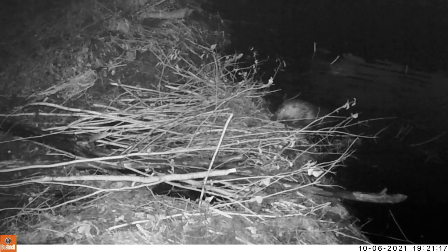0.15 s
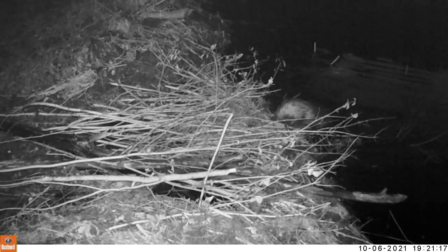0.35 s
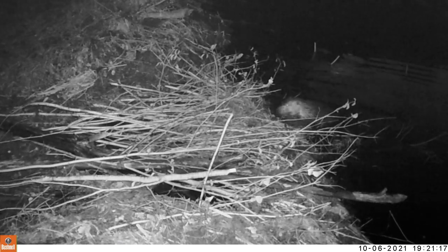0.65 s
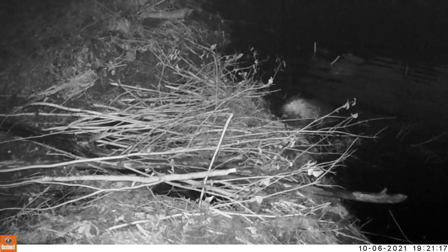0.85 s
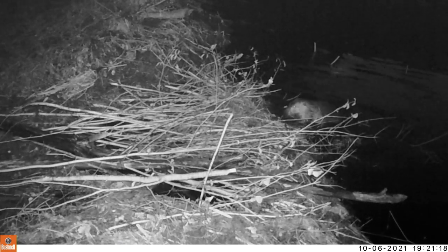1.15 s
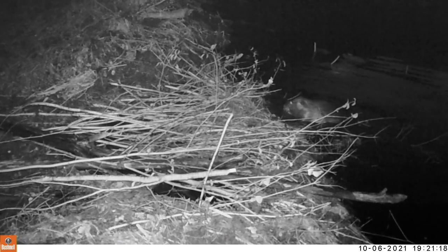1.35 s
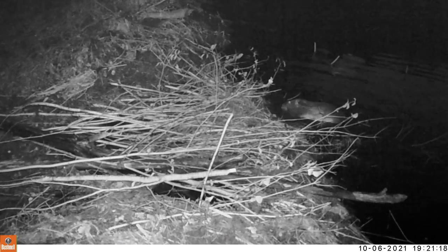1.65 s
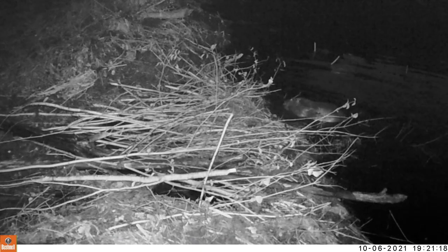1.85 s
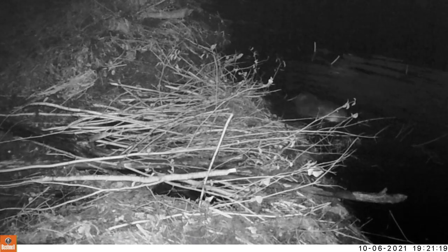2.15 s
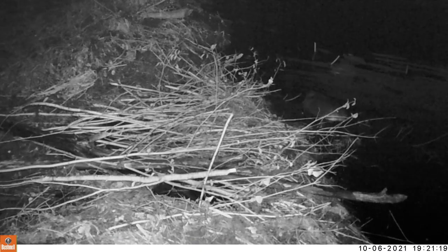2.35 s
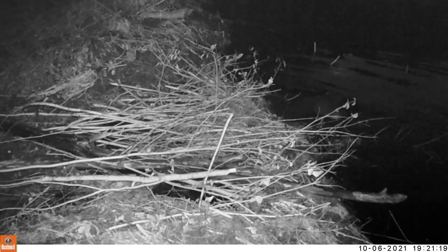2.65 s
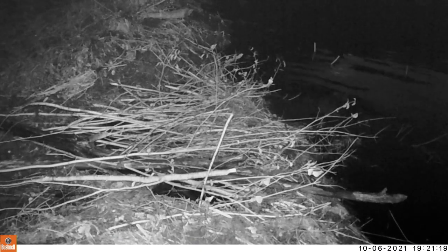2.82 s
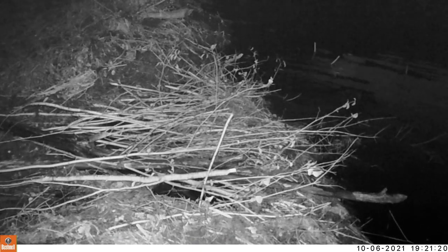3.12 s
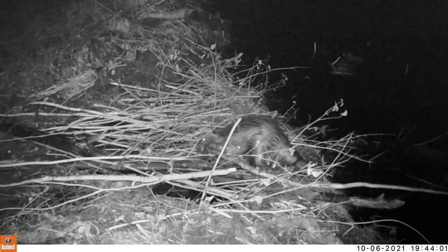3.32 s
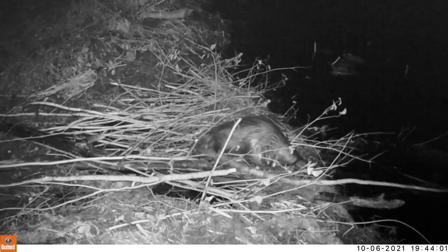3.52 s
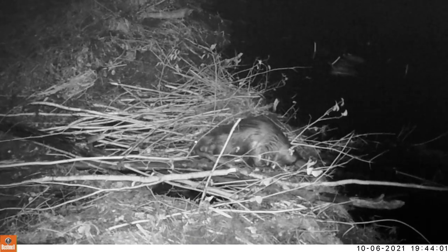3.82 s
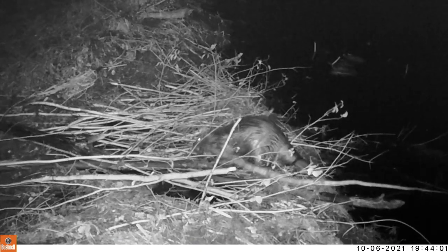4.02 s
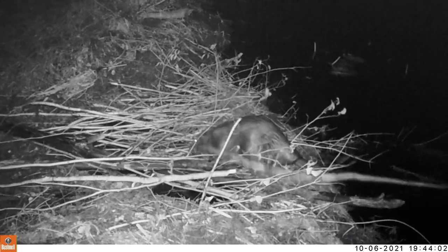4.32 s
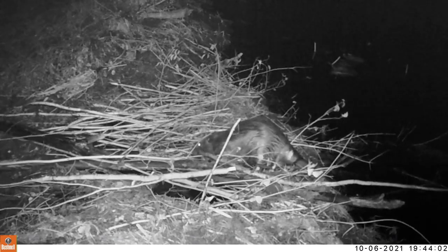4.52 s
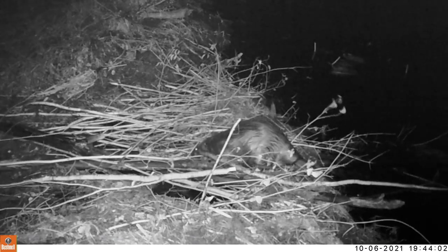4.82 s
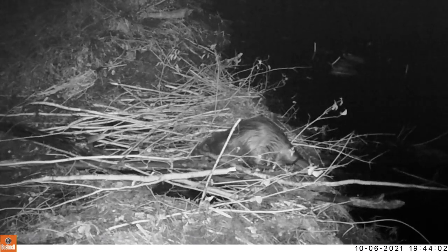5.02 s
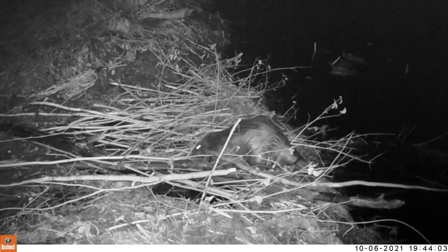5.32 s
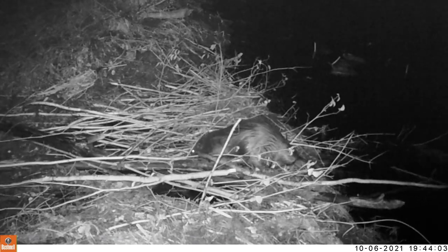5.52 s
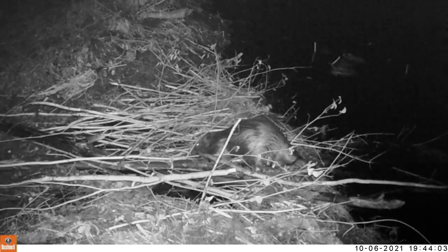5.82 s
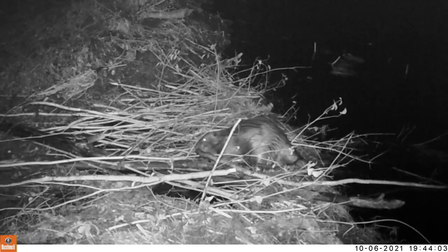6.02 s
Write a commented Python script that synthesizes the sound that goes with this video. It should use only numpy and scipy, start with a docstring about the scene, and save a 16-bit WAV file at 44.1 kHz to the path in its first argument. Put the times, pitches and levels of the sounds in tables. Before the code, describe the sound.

Water rushes low and steady over a beaver dam at night, with small bubbles popping, drops ticking on wet sticks and a faint hum underneath. From the start a cricket trills close by, high-pitched, in quick runs broken by tiny stumbles. A second, brighter cricket joins at about 0.5 seconds, grows louder and stops at 3.3 seconds. At that moment the whole sound drops abruptly to very quiet for half a second. At about 3.8 seconds the water and the close cricket return, and a deeper, wavering hum now stands out. The beaver cracks a twig at 4.3 seconds, followed by a quick cluster of snaps around 4.5 seconds. From about 5.2 seconds the cricket slows, halting near 5.8 seconds. One more sharp twig snap comes at 5.9 seconds, while the water and hum carry on to the end, just after 6 seconds.

```python
"""Night at a beaver dam. Water rushes low over a faint hum, bubbling and trickling through the sticks.
From the start a cricket trills close by, scraping its wings together and stumbling now and then.
A brighter one joins it from 0.5 s to 3.3 s. Then the level drops abruptly for half a second,
and after that a deeper hum stands out. From 4.3 s the beaver cracks a few twigs,
and near the end the first cricket slows to a halt."""
import sys
import numpy as np
from scipy import signal
from scipy.fft import rfft, irfft, next_fast_len
from scipy.io import wavfile
from scipy.ndimage import uniform_filter1d

SR = 44100
rng = np.random.default_rng(int(sys.argv[2]) if len(sys.argv) > 2 else 0)


def store_wav(level_fs):
    """Save 16-bit WAV to argv[1]."""
    pcm = np.round(np.clip(np.atleast_2d(level_fs), -1, 1) * 32767)
    wavfile.write(sys.argv[1], SR, pcm.T.astype(np.int16))


N = 272087
TIME = np.arange(N) / SR
QUIET_FROM_S, QUIET_TO_S, QUIET_DB = 3.3447, 3.8278, -24


def undb(db):
    """Turn decibels into a number to multiply by."""
    return 10 ** (np.asarray(db) / 20)


def unit(x):
    """Scale a sound to an average (rms) size of 1."""
    return x / np.sqrt(np.mean(x ** 2))


def wander(rate):
    """A smooth random curve that heads for a new value `rate` times a second."""
    hold = int(SR / rate)
    steps = np.repeat(rng.standard_normal(N // hold + 1), hold)
    return unit(uniform_filter1d(uniform_filter1d(steps, hold), hold)[:N])


def ring(x, modes):
    """Let a sound ring at several pitches, every second one flipped upside down."""
    return sum((-1) ** k * undb(db) * signal.lfilter(*signal.iirpeak(hz, hz / width, fs=SR), x)
               for k, (hz, width, db) in enumerate(modes))


def add(track, start_s, sound):
    """Mix a short sound into a track."""
    i = int(np.clip(start_s * SR, 0, N))
    track[i:i + len(sound)] += sound[:N - i]


# The water's tone, low to high. Each row: pitch in Hz, level in dB per Hz.
WATER_TONE = [(6, -50), (18, -50.5), (45, -56), (100, -61), (200, -68), (400, -75), (1000, -85),
              (2000, -90.5), (3500, -93.5), (5200, -95.5), (7500, -98), (10000, -99.5), (13800, -101)]
def rushing_water(surge_db=0.04, flicker_db=0.7):
    """Water pours over the dam: bands of noise, an octave apart, surge a little and flicker."""
    hz, db = np.transpose(WATER_TONE)
    size = next_fast_len(N)
    octave = np.log2(np.maximum(np.arange(size // 2 + 1) * SR / size, 1))
    shape = undb(np.interp(octave, np.log2(hz), db)) * np.sqrt(SR / 2)
    spectrum = rfft(rng.standard_normal(size)) * shape
    out, surge = 0, surge_db * wander(6.5)
    for centre in range(2, 16):
        band = irfft(spectrum * np.clip(1 - abs(octave - centre), 0, 1), size)[:N]
        out = out + band * undb(surge + flicker_db * wander(18))
    return out


# Two hums. Each row: pitch in Hz, width in Hz, level in dB before the quiet moment, then from it on.
LOW_HUMS = [(62.74, 2.9, -73, -43.5), (93.3, 7, -50.5, -56)]
def hum():
    """Two low hums waver far away; the deeper one takes over when the quiet moment begins."""
    out = 0
    for hz, width, before_db, after_db in LOW_HUMS:
        mode = [(hz, width, 0)]
        tone = unit(ring(ring(rng.standard_normal(N), mode), mode))
        out = out + tone * undb(np.where(TIME < QUIET_FROM_S, before_db, after_db))
    return out


def wing_stroke(rate, top_hz, closed_hz=3928, full_rate=51, rough_db=1.2, growth_db=4.5):
    """One wing scrapes over the other's teeth, slowing (lower pitch) and pressing harder (louder)."""
    length_s = 0.01075 * (full_rate / rate) ** 0.32  # slower wings make longer strokes
    progress = np.linspace(0, 1, int(length_s * SR))
    # the teeth catch unevenly, in speed and in force
    speed, force = (np.interp(progress, np.linspace(0, 1, 10), row)
                    for row in rng.standard_normal((2, 10)))
    hz = (top_hz + (closed_hz - top_hz) * progress ** 2.1) * (1 + 0.0087 * speed)
    fade_in = 0.072 + 1.4 * max(1 - rate / full_rate, 0)  # slower wings start more softly
    contact = np.clip(progress / fade_in, 0, 1) * np.clip((1 - progress) / 0.15, 0, 1)
    phase = 2 * np.pi * np.cumsum(hz) / SR
    return phase, contact * undb(rough_db * force - growth_db * (1 - progress ** 2))


# How the wings colour the overtone, an octave up. Each row: pitch in Hz, width in Hz, boost in dB.
WING_RING = [(8030, 150, 8), (8750, 900, -5)]
def cricket(runs, tempo, song, scatter_db=0.65, scatter_pitch=0.0033, scatter_s=0.00018):
    """A cricket trills in runs of wing strokes; the last of a run can slip and catch late."""
    tone, overtone = np.zeros((2, N))
    song_times, *song_columns = np.transpose(song)
    for when, strokes, slip in runs:
        for k, (late, sharp, loud) in enumerate(rng.standard_normal((int(strokes), 3))):
            rate = np.interp(when, *np.transpose(tempo))
            top_hz, db, overtone_db = (np.interp(when, song_times, column) for column in song_columns)
            phase, force = wing_stroke(rate, top_hz * (1 + scatter_pitch * sharp))
            force *= undb(scatter_db * loud)
            if k == int(strokes) - 1:
                force *= undb(slip * np.linspace(0.5, -0.24, len(force)))
            start_s = when + scatter_s * late
            add(tone, start_s, undb(db) * force * np.sin(phase))
            add(overtone, start_s, undb(overtone_db) * force * np.sin(2 * phase))
            when = when + 1 / rate
    return tone + ring(overtone, WING_RING)


def thicket(x, echo_db=-16, decay_s=0.047):
    """The sticks and the bank scatter a short, weak echo."""
    t = TIME[:SR // 5]
    tail = rng.standard_normal(len(t)) * np.exp(-t / decay_s)
    return x + undb(echo_db) * signal.fftconvolve(x, tail / np.linalg.norm(tail))[:N]


# Runs of wing strokes. Each row: start in seconds, number of strokes, slip (0 is none, lower is more).
CLOSE_RUNS = [ (.0023, 9, -8), (.18, 11, -12), (.3967, 27, -12), (.9276, 12, -12), (1.1655, 10, -12),
              (1.3638, 12, 0), (1.6022, 24, 0), (2.0765, 13, -8), (2.333, 24, -10), (2.8104, 15, -12),
              (3.1074, 13, -8), (3.3625, 47, -24), (4.3016, 24, -6), (4.7824, 18, -10), (5.1454, 10, -3),
              (5.3772, 17, 0), (6.141, 1, -6)]
BRIGHT_RUNS = [(.528, 42, 0), (1.3724, 95, 0)]
# How fast the wings move. Each row: time in seconds, strokes per second.
CLOSE_TEMPO = [(0, 51.1), (3.2, 50.7), (3.5, 50.2), (5.1, 49.9), (5.25, 48.6), (5.63, 39.7), (5.73, 33.7)]
BRIGHT_TEMPO = [(1.25, 49.8), (1.4, 48.65), (2.25, 48.6), (2.7, 47.9), (3.3, 47.3)]
# The song. Each row: time in seconds, a stroke's starting pitch in Hz, level in dB, overtone in dB.
CLOSE_SONG = [(0, 4520, -39.5, -69), (3.3, 4495, -39.5, -66), (3.9, 4445, -39, -68),
              (5.1, 4406, -38.5, -66), (5.7, 4340, -39.5, -74)]
BRIGHT_SONG = [(.53, 4360, -54, -62), (1.15, 4330, -47, -56), (1.7, 4462, -40.5, -55.5),
               (3.3, 4588, -40, -56.5)]
def crickets():
    """A close cricket and a brighter one sing among the sticks."""
    close = cricket(CLOSE_RUNS, CLOSE_TEMPO, CLOSE_SONG)
    bright = cricket(BRIGHT_RUNS, BRIGHT_TEMPO, BRIGHT_SONG)
    return thicket(close + bright)


# The clearest bubbles. Each row: start in seconds, pitch in Hz, peak level in dB.
CLEAR_BUBBLES = [(.192, 2030, -46), (.43, 1880, -45), (.862, 2380, -47), (1.172, 3100, -46),
                 (1.916, 1800, -49), (2.803, 1380, -47), (4.608, 1790, -50), (5.924, 2067, -47)]
def bubbles(fizz_db=-64, decay_cycles=11, rise=0.038, low_hz=600, high_hz=3600, count=600):
    """A few clear bubbles and many small ones ring briefly, rising in pitch as they surface."""
    out = np.zeros(N)
    small = [(when * N / SR, low_hz * (high_hz / low_hz) ** pitch, fizz_db - 3.5 * np.log(faint + .005))
             for when, pitch, faint in rng.random((count, 3))]
    for when, hz, db in list(CLEAR_BUBBLES) + small:
        decay_samples = decay_cycles * SR / hz
        age = np.arange(int(5 * decay_samples)) / decay_samples
        phase = 2 * np.pi * decay_cycles * age * (1 + rise * age / 2)
        add(out, when, undb(db) * np.sin(phase) * np.exp(-age))
    return out


def burst(db, decay_s):
    """A short, fading puff of noise."""
    t = TIME[:SR // 25]
    return undb(db) * np.exp(-t / decay_s) * rng.standard_normal(len(t))


# The clearest drops. Each row: start in seconds, level in dB before the boosts.
CLEAR_DROPS = [(1.292, -42), (1.536, -43), (1.76, -41), (2.547, -45), (3.921, -45), (4.398, -41),
               (4.471, -42), (5.2, -44), (5.302, -45), (5.586, -47)]
# How a drop rings. Each row: pitch in Hz, width in Hz, boost in dB.
DROP_RING = [(5700, 520, 8), (6630, 1600, 2.5), (9000, 2000, -15)]
def trickle(boost_db=2, patter_db=-53, count=480):
    """A few clear drops and a patter of small ones tick on the wet sticks."""
    out = np.zeros(N)
    for when, db in CLEAR_DROPS:
        add(out, when, burst(db + boost_db, decay_s=0.0036))
    for when, faint in rng.random((count, 2)) * [N / SR, 1]:
        add(out, when, burst(patter_db - 2.5 * np.log(faint + 0.013), decay_s=0.0023))
    return ring(out, DROP_RING)


# Twigs breaking. Each row: start in seconds, tearing in dB, extra dB for the snap, extra dB for the body.
TWIG_CRACKS = [(4.266, -41, 1, 2), (4.267, -32.5, 8, -1), (4.484, -46, 0, 6), (4.509, -39, 4, 1),
               (4.532, -41, 9, 3), (4.5455, -40, 9, 6), (4.5608, -28.5, 15, -2.5), (4.572, -31, 4, -12),
               (5.885, -43, 20, -14)]
# How the wood rings: its low body and bright edge. Each row: pitch in Hz, width in Hz, boost in dB.
WOOD_BODY = [(1650, 400, -2), (2750, 770, 3), (3550, 1100, 4)]
WOOD_EDGE = [(5440, 760, -4), (6800, 1000, 4), (9050, 1000, -1), (12100, 2500, -14)]
def twigs():
    """The beaver cracks twigs: a sharp snap, then tearing fibres, make the wood ring."""
    edge, body = np.zeros((2, N))
    for when, tear_db, snap_db, body_db in TWIG_CRACKS:
        crack = burst(tear_db, decay_s=0.0026)
        crack[0] += undb(tear_db + snap_db)
        add(edge, when, crack)
        add(body, when, crack * undb(body_db))
    return ring(edge, WOOD_EDGE) + ring(body, WOOD_BODY)


def scene():
    """Crickets, water, twigs and hum, mixed into one channel."""
    return (crickets() + rushing_water() + bubbles() + trickle() + twigs() + hum())[None]


def record(dry):
    """The level drops abruptly for half a second, and the highest treble is cut throughout."""
    quiet = (TIME > QUIET_FROM_S) & (TIME < QUIET_TO_S)
    treble_cut = signal.ellip(12, .1, 70, 13900, fs=SR, output="sos")  # above 13900 Hz
    return signal.sosfilt(treble_cut, dry * undb(QUIET_DB * quiet))


dry = scene()
out = record(dry)
store_wav(out)
```